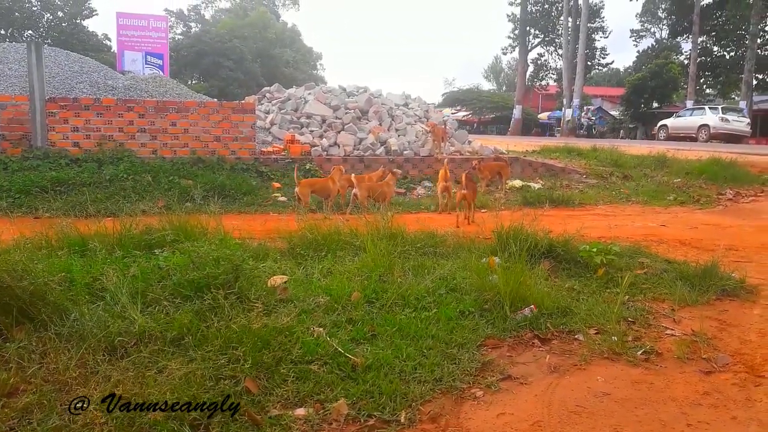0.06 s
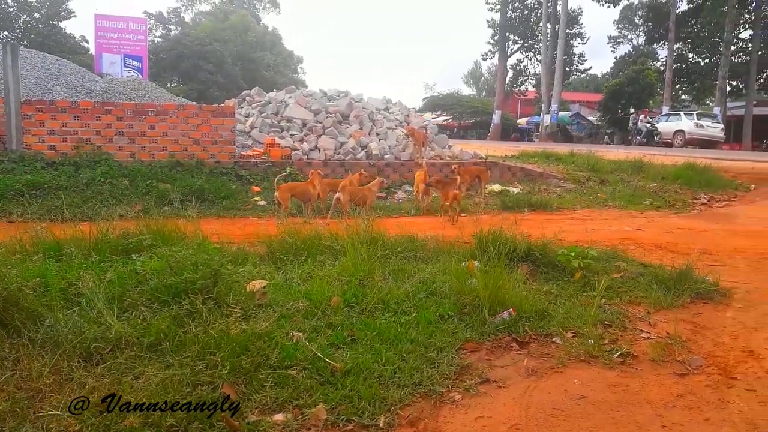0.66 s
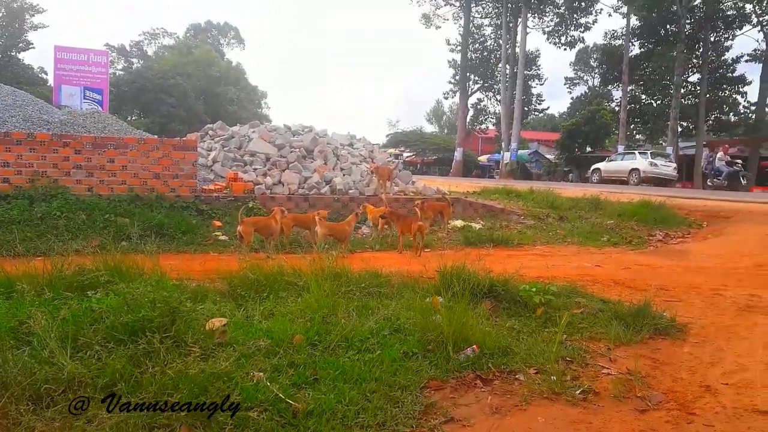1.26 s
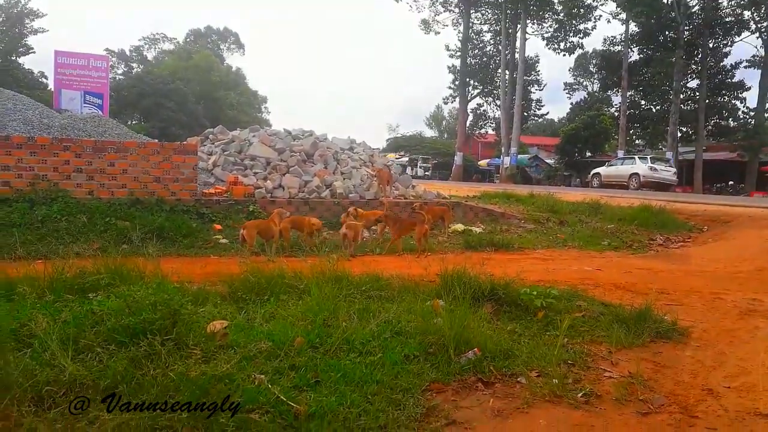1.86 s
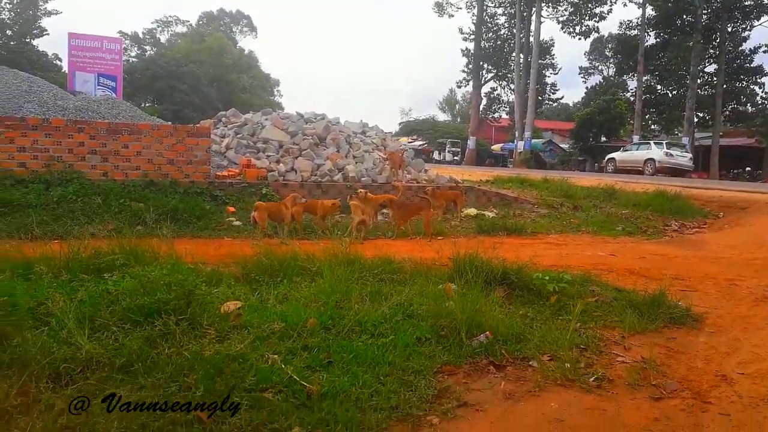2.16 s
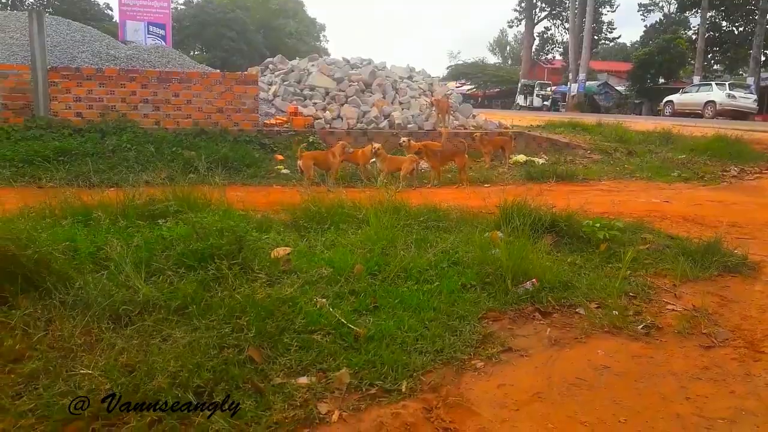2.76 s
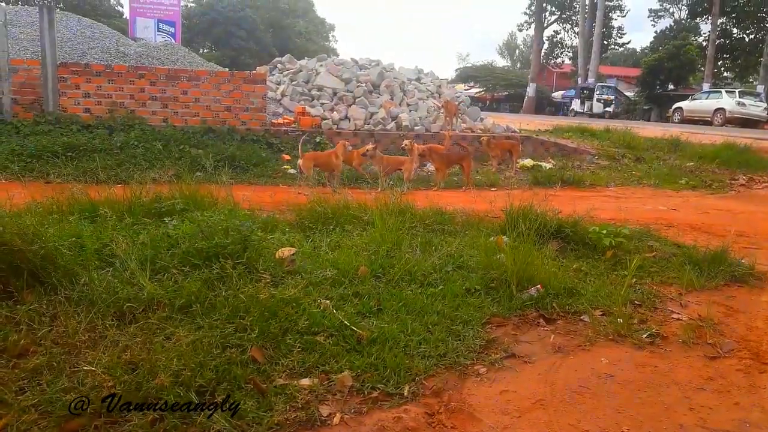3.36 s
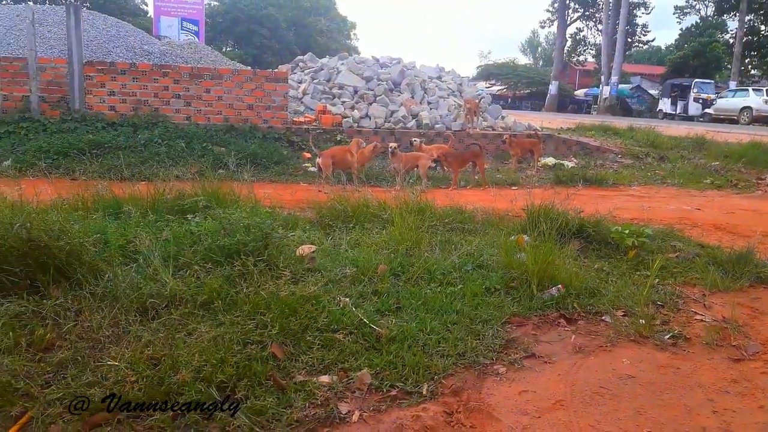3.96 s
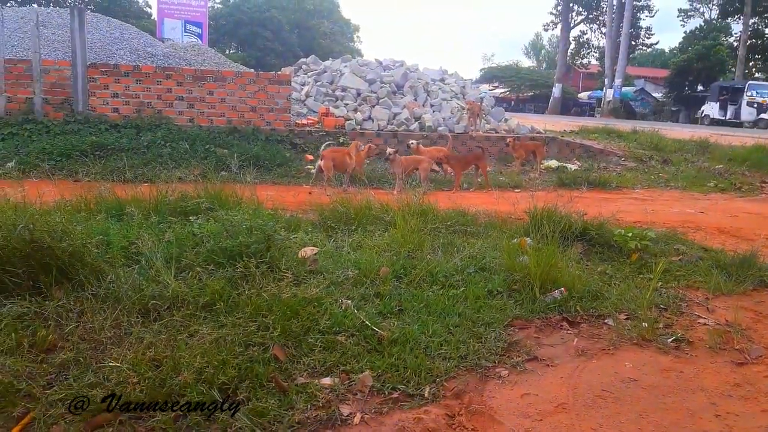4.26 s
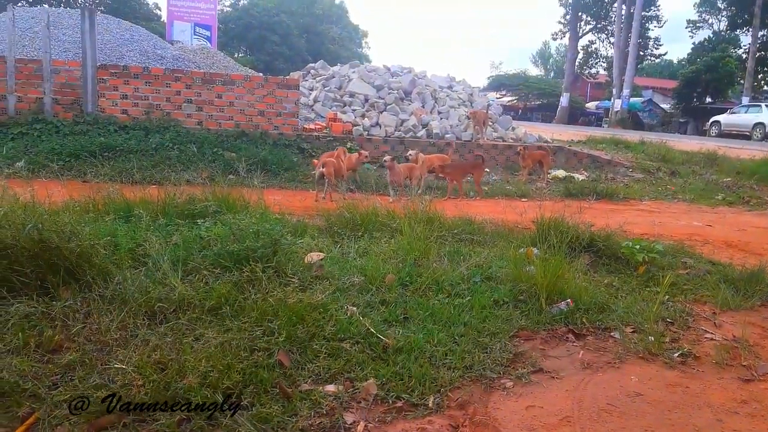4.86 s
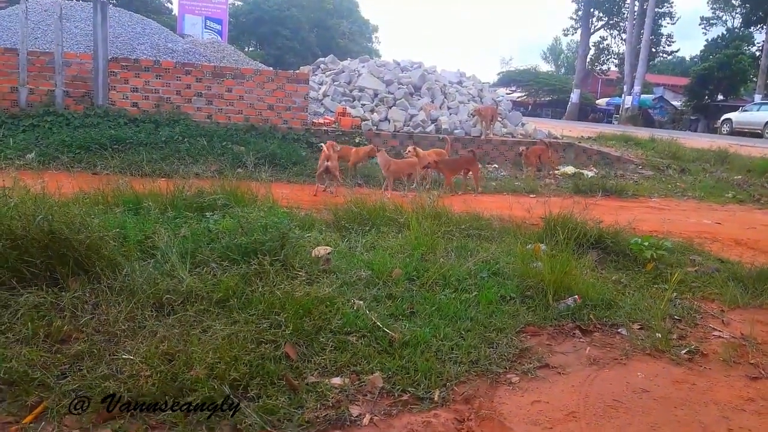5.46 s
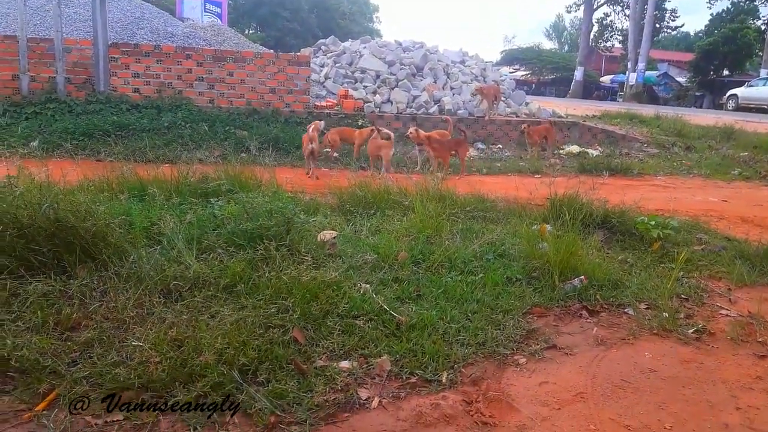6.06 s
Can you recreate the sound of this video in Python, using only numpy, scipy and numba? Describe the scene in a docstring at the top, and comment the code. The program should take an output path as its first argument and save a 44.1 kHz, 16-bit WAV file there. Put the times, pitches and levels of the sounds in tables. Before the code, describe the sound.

Three dogs quarrel outdoors in short, loud calls, with a light echo from a wall and trees. Distant road traffic rumbles and hisses softly throughout. One dog starts with a clear, pitched yelp at about 0.3 seconds, gives a brief whine at 0.5, and keeps yelping several times a second until about 3.4, with a short pause before 2 seconds. A second dog answers with harsh, raspy barks near 1 and 1.3 seconds, then three more between 2.4 and 3.1, overlapping the yelps. From 3.7 to 4.6 seconds a third dog fires off five quick, hollow barks. The harsh dog and the yelping dog then trade calls, ending on a harsh bark at about 6 seconds. A few faint, thin, high whistles sound during the first two seconds, the clearest just before 1 second.

```python
"""Three village dogs quarrel on open ground in front of a brick wall.
One yelps with a clear pitch and whines once, one fires off a run of hollow barks, one answers harshly.
Each bark is vocal fold pulses and breath ringing in throat and mouth, with chest below and rasp on top.
The wall and the trees throw the sound back; road traffic rumbles and hisses behind,
and a few thin whistles pass high above it."""
import sys
import numpy as np
from scipy import signal
from scipy.fft import rfft, irfft, next_fast_len
from scipy.io import wavfile
from scipy.ndimage import uniform_filter1d, minimum_filter1d
from numba import njit

SR = 44100
rng = np.random.default_rng(int(sys.argv[2]) if len(sys.argv) > 2 else 0)


def generate_wav(sig):
    """Save sig (samples, or channels by samples) to the path in sys.argv[1] as 16-bit PCM at SR."""
    pcm = np.round(np.clip(np.atleast_2d(sig).T, -1, 1) * 32767).astype(np.int16)
    wavfile.write(sys.argv[1], SR, pcm)


N = 269451
TIME = np.arange(N) / SR

# colour of the engine rumble and of the tyre hiss: f/Hz, level/dB
RUMBLE_EQ = [(25, -41), (50, -8.5), (80, 1.5), (115, 9.5), (160, 4), (250, 0.5), (330, -10), (500, -41)]
TYRE_EQ = [(250, -9), (500, 6.5), (900, 2), (1500, 0.5), (2300, -6.5), (4000, -15.5), (6300, -18),
           (8000, -24.5), (11500, -30.5), (15500, -31)]
# fader ride of the road: t/s, rumble level/dB, tyre level/dB
ROAD_FADERS = [(0.0, -36.5, -40.5), (0.24, -32, -39), (0.75, -33, -34.5), (1.1, -37.5, -33.5),
               (2.0, -32, -35), (2.7, -37, -30), (3.15, -33, -39), (3.6, -32.5, -36.5), (3.9, -34, -27.5),
               (5.3, -32, -32), (5.9, -28.5, -33), (6.11, -38.5, -31)]
# thin whistles: t/s, length/s, f/Hz, level/dB, fade/(dB/s)
WHISTLE_CUES = [(0.0, 0.1, 4700, -45, 200), (0.836, 0.48, 6430, -33, 62), (1.724, 0.08, 6370, -49, 38),
                (1.78, 0.3, 4660, -55, 8)]

# cue lists, one row a call: t/s, length/s, pitch f/Hz, relative throat level/dB,
# mouth opening as level over the throat/dB, mouth resonance f/Hz, extra treble/dB
YELP_CUES = [(0.297, 0.125, 607, -14.5, -0.5, 1080, 1.5), (0.667, 0.12, 581.3, -18.5, 1.5, 1350, 4.5),
             (1.165, 0.13, 613.6, -15, -0.5, 1350, 1), (1.467, 0.14, 580, -13, -4, 1110, 0),
             (2.05, 0.15, 583, -7.5, -5, 1370, -2.5), (2.242, 0.14, 559.5, -11.5, -2.5, 1260, 2.5),
             (2.427, 0.086, 542, -14.5, -9, 1140, -1), (2.637, 0.14, 582.7, -14, -3.5, 1100, 1),
             (2.892, 0.1, 569.4, -11, -12, 1155, -1), (3.027, 0.12, 595.3, -14.5, -6.5, 1065, 0.5),
             (3.297, 0.13, 572.6, -16.5, -3, 1023, 1), (4.667, 0.11, 559, -17.5, 4.5, 1260, -0.5),
             (4.862, 0.14, 575, -11.5, -1, 1350, -6), (5.525, 0.15, 600.7, -12.5, 3.5, 1284, -5)]
WHINE_CUES = [(0.532, 0.135, 568, -16.5, -10.5, 1200, 0)]
HARSH_CUES = [(0.952, 0.14, 535.4, -16.5, 6.3, 1020, 1), (1.272, 0.13, 544.3, -23, 12.1, 1050, 3),
              (2.447, 0.13, 495, -25, 17, 1030, 3), (2.787, 0.13, 504, -16, 4.5, 944, 0),
              (2.977, 0.12, 518.3, -26.5, 12.9, 950, -5), (4.575, 0.13, 551, -13.5, 3.1, 1080, 1.5),
              (4.987, 0.14, 554, -11.5, 2.4, 1125, 0.5), (5.203, 0.15, 551.6, -16, 5.6, 1116, -4),
              (5.932, 0.14, 542, -20.5, 10.9, 1120, -3)]
HOLLOW_CUES = [(3.657, 0.13, 592.2, -10.5, -3.5, 1260, 1.8), (3.807, 0.18, 565, -11.5, -2.5, 1270, -1.4),
               (3.995, 0.16, 551, -9, -7.5, 1180, -1.2), (4.19, 0.175, 543.4, -8, -7.5, 1160, 0),
               (4.397, 0.16, 542.5, -11.5, -4.5, 1295, 0.25)]
# notches in the hollow voice: f/Hz, width/Hz, level/dB
HOLLOW_DIPS = [(2350, 520, -16), (3650, 450, -6)]
# each dog's resonances (f/Hz, width/Hz) and notches (f/Hz, width/Hz, level/dB)
YELPING_VOICE = dict(throat=(576, 118), mouth_width_hz=576, third=(1880, 81), fourth=(2754, 155),
                 dips=[(1678, 177, -11), (3440, 1230, -8.5)])
HARSH_VOICE = dict(throat=(668, 37.4), mouth_width_hz=417, third=(1850, 200), fourth=(2804, 180),
               dips=[(2240, 1000, -5.5), (3420, 2270, -8.5)])
HOLLOW_VOICE = dict(throat=(538, 99), mouth_width_hz=420, third=(1870, 48), fourth=(2864, 280),
                dips=HOLLOW_DIPS)
# delivery: rise/share of the length; pitch glide, opening scoop and closing droop/semitones;
# wow/share by which the mouth resonance sinks at both ends; roughness and its growth per dB of opening;
# third and fourth resonance level over the throat/dB, and how far they follow the opening
YELPING = dict(rise=0.37, glide=.3, scoop=5, droop=1.2, wow=.044, rough=0.453, rough_per_db=0, upper_db=(-4, -6.5),
           follow=0.64)
WHINING = dict(rise=1.2, glide=0.58, scoop=2, droop=1.2, wow=.04, rough=.2, rough_per_db=0, upper_db=(-26, -21),
           follow=0)
HARSH_BARKING = dict(rise=0.33, glide=-0.41, scoop=5, droop=1.2, wow=0.067, rough=0.493, rough_per_db=0.06, upper_db=(-10.5, -10),
                 follow=0.88)
HOLLOW_BARKING = dict(rise=.32, glide=-0.098, scoop=5, droop=1.196, wow=.045, rough=0.636, rough_per_db=.037, upper_db=(-9, -4.5),
                  follow=1)
# relative gain of the breath beside the pulses: throat, mouth, third, fourth resonance
BREATH_GAINS = [9, 7, 9, 12]
# colour of the rasp on every call: f/Hz, level/dB
RASP_EQ = [(280, -81), (420, -2.5), (1500, 16.5), (2300, -58), (3200, -22), (4200, 5.5), (5300, 6),
           (6800, 7.5), (8000, -1), (10500, -2.5), (12000, -7.5), (15500, -7)]

# slaps off the ground and walls: delay t/s, level/dB
SLAPS = [(.0088, -10), (.0148, -14.5), (.0235, -17.5), (.043, -19.5), (.0526, -15.5), (.0753, -21),
         (.0837, -19.5)]
# reverb time among the trees: f/Hz, t60/s
TREE_T60 = [(300, 0.85), (600, 1.95), (1800, 0.7), (3000, 2.5), (8000, 0.72)]

CHEST_HZ, CHEST_WIDTH_HZ = 448, 36
GRUFF_PITCH_HZ, GRUFF_DB_PER_HZ = 579, 0.14   # the chest gains weight as a bark falls below this pitch


def from_db(db):
    """Decibels to gain."""
    return 10 ** (np.asarray(db) / 20)


def unit_rms(x):
    """Scale to rms 1."""
    return x / np.sqrt(np.mean(x ** 2) + 1e-20)


def at_hz(points, hz):
    """Read a table on a log-frequency axis."""
    freqs, values = np.transpose(points)
    return np.interp(np.log(hz + 1), np.log(freqs), values)


def equalise(x, curve):
    """Colour x with an EQ curve; rms 1."""
    size = next_fast_len(len(x))
    hz = np.fft.rfftfreq(size, 1 / SR)
    return unit_rms(irfft(rfft(x, size) * from_db(at_hz(curve, hz)), size)[:len(x)])


def wobble(rate_hz, size):
    """Smooth random modulation; rms 1."""
    r = np.exp(-2 * np.pi * rate_hz / SR)
    return unit_rms(signal.lfilter([1], [1, -2 * r, r * r], rng.standard_normal(size + 2000))[2000:])


def swell(t, length, rise, fall):
    """Smooth envelope whose release is centred on the given length."""
    up, down = np.clip(t / rise, 0, 1), np.clip((length - t) / fall + .5, 0, 1)
    return (np.sin(np.pi / 2 * up) * np.sin(np.pi / 2 * down)) ** 2


@njit
def sweep(x, angle, r):
    """A two-pole band-pass whose centre moves sample by sample."""
    y = np.zeros(len(x))
    for i in range(2, len(x)):
        drive = (1 - r * r) / 2 * (x[i] - x[i - 2])
        y[i] = drive + 2 * r * np.cos(angle[i]) * y[i - 1] - r * r * y[i - 2] + 1e-18
    return y


def resonate(x, envelope, hz, width_hz):
    """Play x under an envelope through a steep moving resonance; the ring has the envelope's energy."""
    r, angle = np.exp(-np.pi * width_hz * np.sqrt(2) / SR), 2 * np.pi * hz / SR
    ring = sweep(sweep(x * envelope, angle, r), angle, r)
    return ring * np.sqrt(np.sum(envelope ** 2) / np.sum(ring ** 2))


def road(lumpy_db=2):
    """The background bed: engines rumble and tyres hiss some way off."""
    times, rumble_db, tyre_db = np.transpose(ROAD_FADERS)
    rumble = equalise(rng.standard_normal(N), RUMBLE_EQ)
    rumble *= from_db(np.interp(TIME, times, rumble_db) + lumpy_db * wobble(13.7, N))
    tyres = equalise(rng.standard_normal(N), TYRE_EQ)
    return rumble + tyres * from_db(np.interp(TIME, times, tyre_db))


def whistles(unsteady=0.0029, edge_s=0.0075, dip_share=.024, dip_at_s=0.0413, dip_width_s=0.041):
    """Thin, slightly unsteady tones that start quickly, dip in pitch and fade."""
    out = np.zeros(N)
    for start, length, hz, db, fade_db_per_s in WHISTLE_CUES:
        t = np.maximum(TIME - start, 0)
        dip = dip_share * np.exp(-((t - dip_at_s) / dip_width_s) ** 2)
        pitch = hz * (1 - dip + unsteady * wobble(62, N))
        level = from_db(db - fade_db_per_s * np.minimum(t, length)) * swell(t, length, edge_s, edge_s)
        out += np.sqrt(2) * np.sin(2 * np.pi * np.cumsum(pitch) / SR) * level
    return out


def vocal_folds(hz, rough, split=0.7, harmonics=26):
    """Folds chop the breath on a pitch curve; returns the pulses and the air puffing through."""
    size = len(hz)
    jittered_hz = hz * (1 + .06 * rough * wobble(150, size))
    phase = 2 * np.pi * np.cumsum(jittered_hz) / SR
    pulses = np.sin((harmonics + .5) * phase) / (2 * np.sin(phase / 2)) - .5   # equal harmonics
    # strained folds beat unevenly, strong and weak in turn
    shimmer = from_db(3.5 * rough * wobble(200, size))
    uneven = shimmer * (1 + min(split * rough, 1) * np.cos(phase / 2))
    air = rng.standard_normal(size) * (1 + 0.41 * np.cos(phase))
    return pulses * uneven, air * uneven


def rasp(pulses, air):
    """Air and high overtones, combed by a reflection in the muzzle that differs in every bark; rms 1."""
    breathy = pulses + 16 * air
    reflection = np.roll(breathy, int(rng.uniform(.0005, .0012) * SR))
    return equalise(breathy + .7 * reflection, RASP_EQ)


def head_notches(x, dips):
    """Side cavities of the head swallow some bands."""
    for hz, width_hz, db in dips:
        b, a = signal.iirpeak(hz, hz / width_hz, fs=SR)
        x = x - (1 - from_db(db)) * signal.lfilter(b, a, x)
    return x


def dog(cues, voice, manner, sag, lag_s, fall_s, rasp_db, chest_db, scatter=0.011, size=12288):
    """Each call sends pulses and air through four resonances, with a gruff body below and a rasp above."""
    out, t = np.zeros(N + size), np.arange(size) / SR
    for start, length, pitch_hz, throat_db, open_db, mouth_hz, treble_db in cues:
        # a wider mouth makes a bark brighter and can roughen it
        upper_db = np.array(manner["upper_db"]) + manner["follow"] * open_db + treble_db
        gains = from_db(throat_db + np.array([0, open_db, *upper_db]))
        rough = np.clip(manner["rough"] + manner["rough_per_db"] * open_db, .05, .7)
        # at both ends the pressure is low and the jaw half shut: pitch and resonances sag
        along = np.clip(2 * t / length - 1, -1, 1.2)
        slack = along ** 2
        bend = np.where(along < 0, manner["scoop"], manner["droop"])
        semitones = manner["glide"] * along / 2 - bend * slack
        pulses, air = vocal_folds(pitch_hz * 2 ** (semitones / 12), rough)
        rise_s = manner["rise"] * length
        opening = swell(t, length, rise_s, fall_s)
        throat_swell = swell(t, length + lag_s, rise_s + lag_s, fall_s)   # the throat tone swells last
        resonances = [(*voice["throat"], throat_swell, sag),
                      (mouth_hz, voice["mouth_width_hz"], opening, manner["wow"])]
        for hz, width_hz in (voice["third"], voice["fourth"]):
            resonances.append((hz * (1 + scatter * rng.normal()), width_hz, opening, sag))
        bark = np.zeros(size)
        for (hz, width_hz, envelope, sink), breath, gain in zip(resonances, BREATH_GAINS, gains):
            source = pulses + breath * rough * air
            bark += gain * resonate(source, envelope, hz * (1 - sink * slack), width_hz)
        # rough barks shake the chest, a gruff body just below the pitch
        chest = resonate(air, opening, np.full(size, CHEST_HZ), CHEST_WIDTH_HZ)
        gruff_db = GRUFF_DB_PER_HZ * (GRUFF_PITCH_HZ - pitch_hz)
        bark += from_db(throat_db + chest_db + gruff_db) * rough * chest
        # the rasp grows with the resonances above the throat
        force = np.sqrt(np.linalg.norm(gains[1:]) * gains[-1])
        bark += from_db(rasp_db) * force * opening * rasp(pulses, air)
        at = int(start * SR)
        out[at:at + size] += bark
    return head_notches(out[:N], voice["dips"])


def outdoors(x, rubble_db=-10, rubble_t60=0.24, trees_gain=0.063, wall_cut_hz=3500, size=65536):
    """A few dull slaps, quick scatter off the rubble and a faint long tail from the trees."""
    t, response = np.arange(size) / SR, np.zeros(size)
    for delay, db in SLAPS:
        response[int(delay * SR)] += from_db(db)
    rubble = rng.standard_normal(size) * from_db(-60 * t / rubble_t60) * (t > .006)
    response += from_db(rubble_db) * unit_rms(rubble) / np.sqrt(size)
    edges_hz, tail = np.geomspace(250, 12000, 9), np.zeros(size)
    for low, high in zip(edges_hz, edges_hz[1:]):
        band_pass = signal.butter(2, [low, high], "band", fs=SR, output="sos")
        decay = from_db(-60 * t / at_hz(TREE_T60, np.sqrt(low * high)))
        tail += signal.sosfilt(band_pass, rng.standard_normal(size)) * decay
    bloom = np.clip(t / 0.24, 0, 1)
    response += trees_gain * unit_rms(tail * bloom) / np.sqrt(size)
    response = signal.sosfilt(signal.butter(1, wall_cut_hz, fs=SR, output="sos"), response)
    return x + signal.fftconvolve(x, response)[:N]


def scene():
    """The mono mix: three dogs and the whistles with their echoes, over the road bed."""
    yelps = dog(YELP_CUES, YELPING_VOICE, YELPING,
                sag=0.049, lag_s=0.00068, fall_s=0.093, rasp_db=-13, chest_db=-11)
    whine = dog(WHINE_CUES, YELPING_VOICE, WHINING,
                sag=0.033, lag_s=0.002, fall_s=0.076, rasp_db=-8, chest_db=-13.5)
    hollow = dog(HOLLOW_CUES, HOLLOW_VOICE, HOLLOW_BARKING,
                 sag=0.049, lag_s=0.0074, fall_s=0.15, rasp_db=-12, chest_db=-18)
    harsh = dog(HARSH_CUES, HARSH_VOICE, HARSH_BARKING,
                sag=0.065, lag_s=0.0029, fall_s=0.091, rasp_db=-14, chest_db=-32)
    dogs = from_db(-3) * (yelps + whine) + from_db(-1.5) * hollow + from_db(-1.38) * harsh
    return (outdoors(dogs + whistles()) + road())[None]


def record(dry, ceiling=1.0, release_db_per_s=250, cutoff_hz=15700):
    """A fast limiter holds the peaks down; a steep low-pass cuts the top."""
    over_db = 20 * np.log10(np.maximum(np.abs(dry[0]) / ceiling, 1))
    held_db = np.maximum.accumulate(over_db + release_db_per_s * TIME) - release_db_per_s * TIME
    gain = uniform_filter1d(minimum_filter1d(from_db(-held_db), size=65), size=65)
    return signal.sosfilt(signal.ellip(16, .1, 90, cutoff_hz, fs=SR, output="sos"), dry * gain)


dry = scene()
out = record(dry)
generate_wav(out)
```